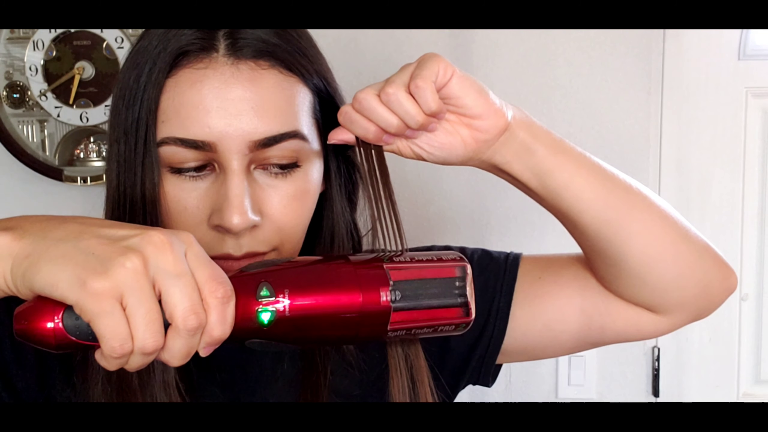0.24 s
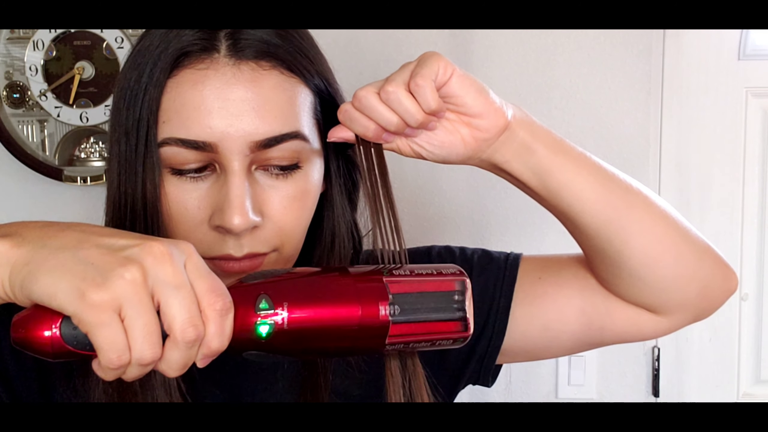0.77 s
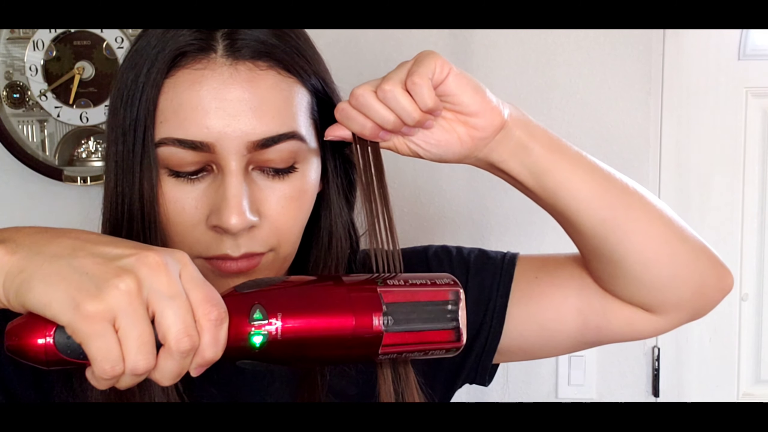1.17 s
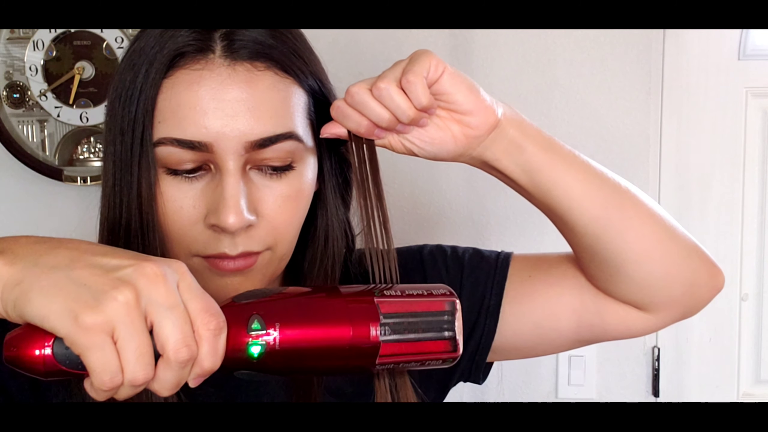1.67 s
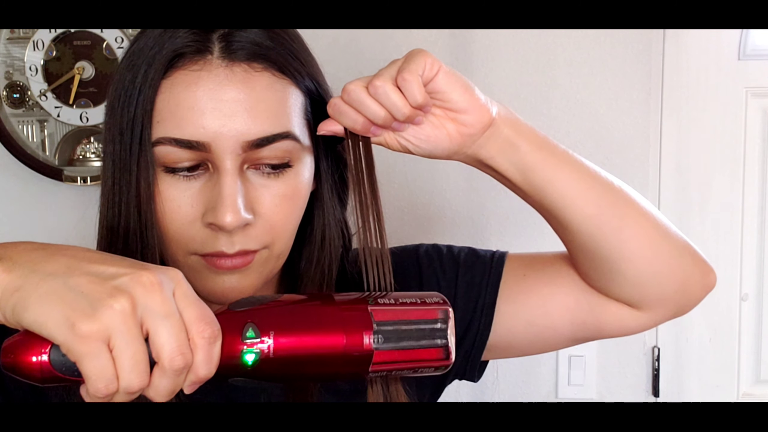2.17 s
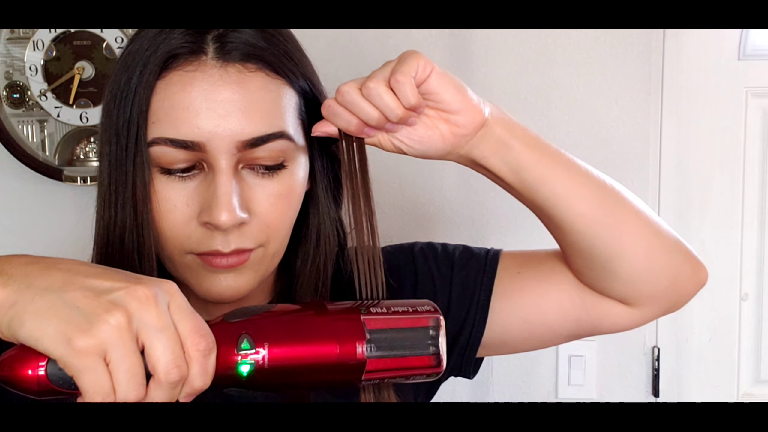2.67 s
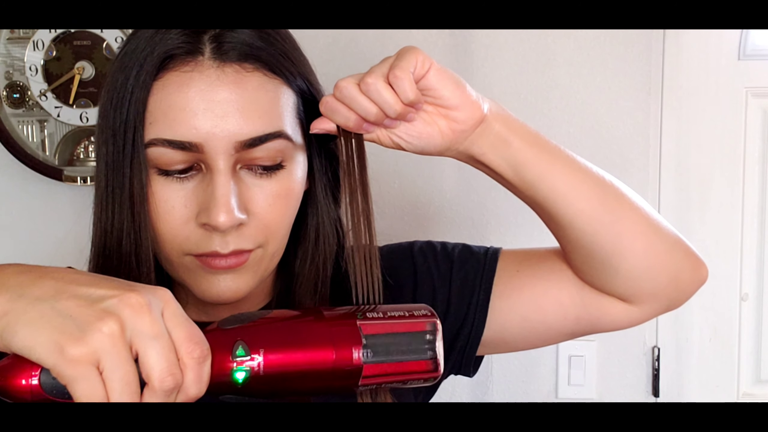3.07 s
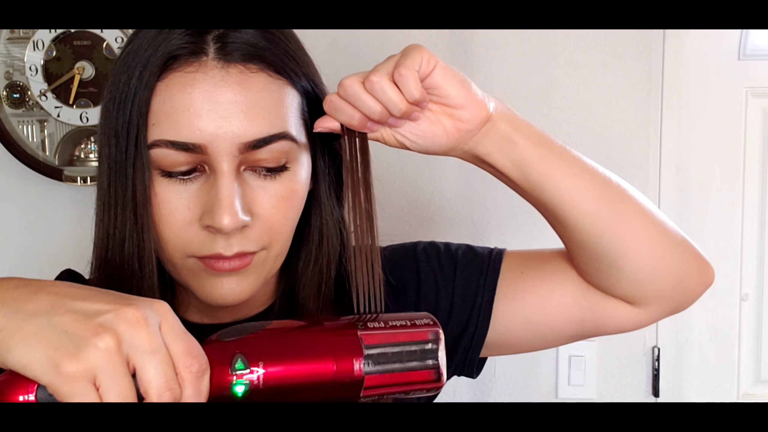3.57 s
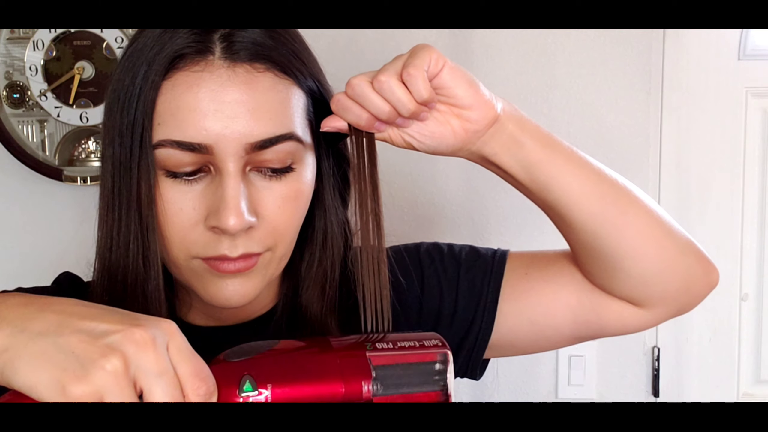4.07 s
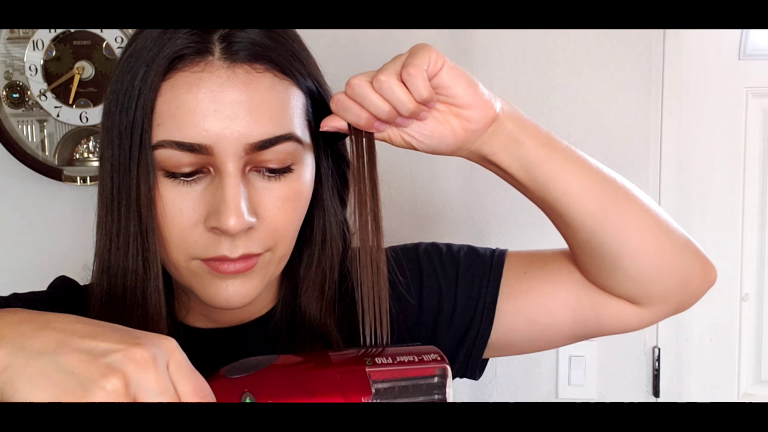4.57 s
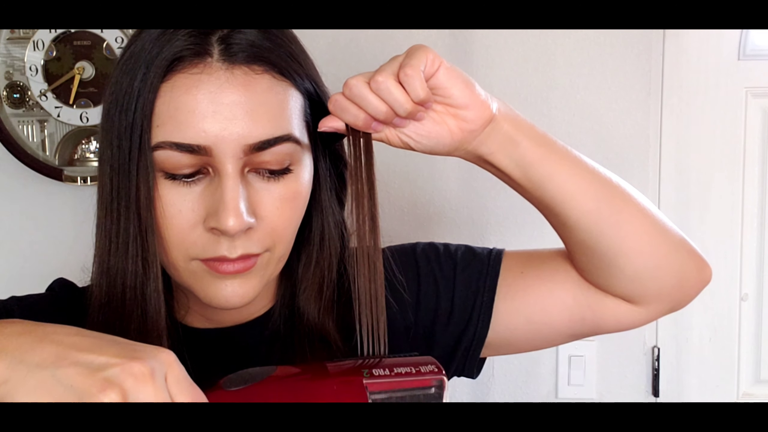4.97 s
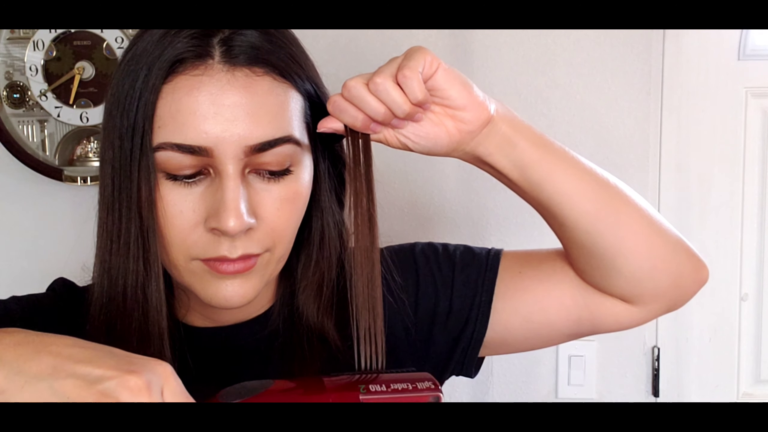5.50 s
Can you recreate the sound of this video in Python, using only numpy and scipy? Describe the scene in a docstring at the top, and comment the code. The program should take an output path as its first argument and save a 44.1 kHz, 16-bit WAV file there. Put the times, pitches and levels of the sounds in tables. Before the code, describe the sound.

A small electric hair trimmer is already running at 0 s and continues to the end, near 5.7 s, close to a stereo microphone in a quiet room. The motor gives a dense, coarse buzz at nearly steady speed, wavering only slightly. Its gears ring the plastic casing in a nasal midrange, while the cutter adds a very rapid knock, about twenty-two per second, blurred into a rough flutter with tiny bright ticks and a repeating scratchy hiss. From about 0.75 to 2.2 s the sound grows brighter and the knock firmer as the tool rolls and hair is pulled tight. It stays strong until about 3.2 s, then the knock softens gradually, while a thin whine strengthens as the tool is lowered and the tone shifts subtly. Short reflections surround it. Beneath lie a deep, steady appliance hum, slightly stronger on the left, and faint low room air.

```python
"""From the start a small hair trimmer runs close by in a quiet room, over the steady hum of an appliance.
Each motor turn repeats the same gear contacts, which ring the plastic casing; the cutter drum turns three
times slower and adds a knock, a few ticks and a scrape that repeats. Mostly between 0.75 and 2.2 s the tool
rolls its window toward the listener, and the knock grows as the hair is drawn tight. As the hand goes on
lowering the tool, with small moves back up, its colour and echoes shift; after 3.2 s the knock softens."""
import sys
import numpy as np
from scipy import signal
from scipy.fft import rfft, irfft
from scipy.io import wavfile
from scipy.ndimage import uniform_filter1d, map_coordinates

SR = 44100
rng = np.random.default_rng(int(sys.argv[2]) if len(sys.argv) > 2 else 0)


def field_ratio(decibels):
    """Amplitude ratio for a level in dB (20 dB per decade); scalars and array-likes work."""
    return 10 ** (np.asarray(decibels, dtype=float) / 20)


def unload_audio(sound):
    """Save the sound as a 16-bit wav file, at the path given as the first command line argument."""
    columns = np.transpose(np.atleast_2d(sound))
    # keep every value between -1 and 1, then stretch to whole-number steps
    steps = np.round(np.clip(columns, -1, 1) * 32767)
    wavfile.write(sys.argv[1], SR, steps.astype(np.int16))


N = 253134  # length [samples]
TIME = np.arange(N) / SR


def rms_one(x):
    """Scale to unit rms."""
    return x / np.sqrt(np.mean(x ** 2) + 1e-20)


def in_time(rows):
    """Columns of a curve table, one value per sample."""
    s, *columns = np.transpose(rows)
    return [np.interp(TIME, s, column) for column in columns]


def level_in_pose(level, pose):
    """Level in dB that follows how far the tool is lowered and rolled."""
    lowered, rolled = pose
    base_db, lowered_db, rolled_db = level
    return base_db + lowered_db * lowered + rolled_db * rolled


def every(turns, share, count):
    """Angles share, share + count, .. that the motor passes, in turns."""
    return np.arange(share % count, turns[-1], count)


def strikes(turns, at, db, slack_us, spread_db):
    """Clicks at given motor angles, each a little early or late and a little uneven."""
    chance = rng.standard_normal((len(at), 2))
    where = np.interp(at, turns, np.arange(N)) + chance[:, 0] * slack_us * SR / 10 ** 6
    where = np.clip(where, 0, N - 2)
    whole = where.astype(int)
    size = field_ratio(db + spread_db * chance[:, 1])
    clicks = np.full(N, 1e-18)
    # a click between two samples is shared by both
    np.add.at(clicks, whole, size * (1 - where + whole))
    np.add.at(clicks, whole + 1, size * (where - whole))
    return clicks


def ring(clicks, modes, order=1):
    """Parallel resonances of alternating sign; passed through more than once they swell before they fade."""
    out = 0
    for k, (hz, width, db) in enumerate(modes):
        r = np.exp(-np.pi * width / SR)
        w = 2 * np.pi * hz / SR
        tone = clicks
        for _ in range(order):
            tone = signal.lfilter([(1 - r * r) / 2, 0, (r * r - 1) / 2], [1, -2 * r * np.cos(w), r * r], tone)
        out = out + (-1) ** k * field_ratio(db) * tone
    return out


def coloured(spectrum, alike, looped=None, repeats=None):
    """Stereo noise of a given spectrum, the two sides alike by a share; part of it may be a looped noise."""
    log_hz = np.log(np.maximum(np.arange(N // 2 + 1) * SR / N, 1))
    hz, db = np.transpose(spectrum)
    gain = field_ratio(np.interp(log_hz, np.log(hz), db))
    white = rfft(rng.standard_normal((2, N)))
    if looped is not None:
        hz, shares = np.transpose(repeats)
        share = np.interp(log_hz, np.log(hz), shares)
        white = np.sqrt(1 - share) * white + np.sqrt(share) * rfft(looped)
    mid, side = irfft(white * gain, N)
    return rms_one(np.sqrt(1 + alike) * mid + np.sqrt(1 - alike) * side * np.array([[1], [-1]]))


# motor speed under the changing pull of the hair: (time [s], speed [turns per s])
MOTOR_SPEED = [(0.0, 67.48), (0.4, 67.246), (0.5, 67.488), (1.11, 67.065), (1.33, 67.384), (1.69, 67.005),
               (2.28, 67.022), (2.49, 67.392), (2.78, 67.095), (3.15, 67.298), (3.56, 67.406),
               (3.79, 67.091), (3.86, 67.405), (4.07, 67.162), (4.83, 67.477), (5.06, 67.35),
               (5.21, 67.376), (5.74, 67.117)]


def motor():
    """Adding up the speed gives the angle, in turns, that times every contact."""
    return np.cumsum(in_time(MOTOR_SPEED)[0]) / SR


# the hand lowers the tool along the hair and rolls its window toward the listener:
# (time [s], lowered [0-1], rolled [0-1])
HAND_POSE = [(0.0, 0.02, 0), (0.75, 0, 0.08), (1.4, 0.35, 0.8), (2.2, 0.3, 1), (3.1, 0.54, 1),
             (3.5, 0.32, 1), (4.2, 0.72, 0.84), (4.6, 0.79, 0.7), (5.3, 0.9, 0.62), (5.74, 0.81, 0.6)]


def hand():
    """The pose of the tool, which sets the loudness of its parts and blends the scrape."""
    return in_time(HAND_POSE)


# gear contacts within one motor turn: (angle [share of turn], then relative force [dB] on
# handle, shell, head, whine, window)
GEAR_CONTACTS = [(0.9754, 5.5, 7.5, 6.5, 22, 7.5), (0.089, -10, -34, -4, -18, 0),
                 (0.243, -2.5, -3.5, -1, -29, -0.5), (0.4603, 12, -12, -2.5, -11, 1.5),
                 (0.6018, -4, -2.5, 0.5, -32, -7), (.72, -48, -47, 2.5, -13, -11),
                 (0.8619, 2.5, -11.5, 3, -24, -10)]
# the drum is slightly out of round, so its three turns press differently: (force in each turn [dB])
TURN_PRESS = [-0.089, 0.28, 0.42]
# how far ahead of the mark handle, shell, head, whine and window are struck: (lead [share of turn] of each)
STRIKE_LEAD = [0.023, 0.0597, 0.04096, 0.0958, 0.0694]
# resonances of the casing parts: (frequency [Hz], width [Hz], relative level [dB])
HANDLE_MODES = [(1101, 176, 4), (1349, 72, -4.5), (876.6, 37, -9), (733, 36, -10.5), (676.5, 73, -16)]
SHELL_MODES = [(1610, 267, -5), (1946, 155, -15)]
HEAD_MODES = [(2109, 160, -2), (2216, 122, -0.5), (2364, 57, -17), (2534, 100, 2), (2700, 58, -8),
              (3021, 55, -1.5), (3186, 156, -1.5)]
WHINE_MODES = [(2758, 60, -1), (2829, 55, 1.5), (2360, 110, -8), (2692, 50, -8)]
WINDOW_MODES = [(3457, 53, -0.5), (3373, 61, -13), (3662, 210, 7), (3880, 97, 15), (4138, 240, -1),
                (4320, 146, -10), (4490, 176, -1.5), (5166, 100, -6.5)]
# loudness of each part: (relative base level [dB], gain fully lowered [dB], gain fully rolled [dB])
HANDLE_LEVEL = (-29, -4.0, 0.8)
SHELL_LEVEL = (-35, 3, -0.5)
HEAD_LEVEL = (-27, -11.5, 0.9)
WHINE_LEVEL = (-45.5, 18, 0.5)
WINDOW_LEVEL = (-33.5, 0.4, 6.5)


def gears(turns, pose):
    """The same contacts every turn ring each part of the casing; also gives the clicks on the window."""
    parts = [(HANDLE_MODES, HANDLE_LEVEL), (SHELL_MODES, SHELL_LEVEL), (HEAD_MODES, HEAD_LEVEL),
             (WHINE_MODES, WHINE_LEVEL), (WINDOW_MODES, WINDOW_LEVEL)]
    angles = [every(turns, row[0], count=1) for row in GEAR_CONTACTS]
    at = np.concatenate(angles)
    rows = np.concatenate([[row] * len(a) for row, a in zip(GEAR_CONTACTS, angles)])
    press_db = np.array(TURN_PRESS)[np.round(at).astype(int) % 3]
    casing, touch = 0, 0
    for k, (modes, level) in enumerate(parts):
        # gears run true: little slack in time, nearly even force
        touch = strikes(turns, at - STRIKE_LEAD[k], rows[:, k + 1] + press_db, slack_us=6, spread_db=.8)
        part = rms_one(ring(touch, modes, order=2))
        casing = casing + field_ratio(level_in_pose(level, pose) - 2.5) * part
    return casing, touch


# the short knock of the cutter: (frequency [Hz], width [Hz], relative level [dB])
KNOCK_MODES = [(3656, 700, -0.5), (4063, 590, 1.5), (2490, 310, -3)]
# the cutter knocks harder once the hair is drawn tight: (time [s], level [dB])
KNOCK_CURVE = [(0, -17), (1.2, -15), (1.7, -11), (2.2, -8.5), (3.2, -8.5), (4.0, -10), (4.8, -11.5),
               (5.74, -12)]
# blade ticks: (turn of drum cycle [motor turns], relative level [dB])
BLADE_TICKS = [(1, -18.5), (2.93, -18.5), (1, -11.5), (1.2, -23)]
# the bright ring of a tick: (frequency [Hz], width [Hz], relative level [dB])
TICK_MODES = [(11020, 420, 1.5), (13400, 1500, -28)]
# loudness of the ticks: (relative base level [dB], gain fully lowered [dB], gain fully rolled [dB])
TICK_LEVEL = (7.5, 0, 6.5)


def cutter(turns, pose):
    """One short knock and a few bright ticks each drum cycle of three motor turns."""
    knock_at = every(turns, 1.935, count=3)
    blows = strikes(turns, knock_at, 0, slack_us=6, spread_db=.6)
    knock = ring(blows, KNOCK_MODES, order=3)
    knock = knock / np.percentile(np.abs(knock), 99.9)  # nearly its peak
    clicks = sum(strikes(turns, every(turns, turn, count=3), db, slack_us=6, spread_db=1.5)
                 for turn, db in BLADE_TICKS)
    ticks = ring(clicks, TICK_MODES)
    return field_ratio(in_time(KNOCK_CURVE)[0]) * knock + field_ratio(level_in_pose(TICK_LEVEL, pose)) * ticks


def scrape(turns, lowered):
    """Two noises tied to the drum's angle; each blends through three patterns as the tool is lowered."""
    grain_s, grain_db = .0005, 2.5  # rough and smooth spots on the drum
    size = int(3 * N / turns[-1])  # samples in an average drum cycle
    angle = turns / 3 % 1 * size
    spots = rms_one(uniform_filter1d(rng.standard_normal(size), int(grain_s * SR), mode="wrap"))
    patterns = rng.standard_normal((3, 2, size)) * field_ratio(grain_db * spots)
    out = np.zeros((2, N))
    for k, pair in enumerate(patterns):
        weight = np.cos(np.pi * (lowered + 2 * k / 3))
        out += weight * np.array([map_coordinates(p, [angle], order=3, mode="grid-wrap") for p in pair])
    return rms_one(out)


# loose rattle and air of the motor: (frequency [Hz], relative level [dB per Hz])
RATTLE_SPECTRUM = [(400, -29.5), (700, -24), (1100, -15.5), (1500, -20.5), (1900, -14.5), (2300, -10),
                   (2700, -5), (3100, -9.5), (3400, -5), (3800, -11), (4100, -9.5), (4500, -9),
                   (5200, -14.5), (6200, -20.5), (7900, -18.5), (9100, -24.5), (10900, -20.5), (12500, -23),
                   (14500, -26), (15600, -14.5)]
# the drum scrapes the same way every cycle: (frequency [Hz], share of the rattle's power that repeats [0-1])
SCRAPE_SHARE = [(600, .85), (4500, .8), (5500, .65), (8000, .55), (12000, .4)]
# a narrow ring of the scrape, then a high ring: (frequency [Hz], width [Hz], relative level [dB])
BUZZ_MODES = [(4140, 350, 0)]
UPPER_MODES = [(7940, 460, -6), (6740, 1100, -6)]
# loudness of each: (relative base level [dB], gain fully lowered [dB], gain fully rolled [dB])
RATTLE_LEVEL = (-41, -0.67, 0.1)
BUZZ_LEVEL = (-35.5, -9.5, -4.5)
UPPER_LEVEL = (-35, 1.5, -6)


def rattle(touch, looped, pose):
    """Loose parts hiss all the time and flare for a moment after each contact; a small part rings high."""
    fade = np.exp(-1 / (0.002 * SR))  # 2 ms
    flare = rms_one(signal.lfilter([1], [1, -fade], touch))
    noise = coloured(RATTLE_SPECTRUM, alike=0.025, looped=looped, repeats=SCRAPE_SHARE) * (1 + 0.57 * flare)
    # the hiss is levelled by its treble
    treble = signal.butter(4, [9000, 15000], "band", fs=SR, output="sos")
    treble_rms = np.sqrt(np.mean(signal.sosfilt(treble, noise) ** 2))
    hiss = field_ratio(level_in_pose(RATTLE_LEVEL, pose) + 2.0) * noise / treble_rms
    buzz = field_ratio(level_in_pose(BUZZ_LEVEL, pose)) * rms_one(ring(looped, BUZZ_MODES, order=2))
    shaken = (rng.standard_normal((2, N)) + looped) * (1 + 0.077 * flare)
    high_ring = field_ratio(level_in_pose(UPPER_LEVEL, pose) - 2.5) * rms_one(ring(shaken, UPPER_MODES, order=2))
    return hiss + buzz + high_ring


# near echoes off the hands, chest and wall, left list then right list:
# (delay at start [ms], delay at end [ms], level before the side's gain [dB])
ECHO_PATHS = [
    [(.31, 0.55, -11.5), (1.3, 1.15, -21.5), (3.7, 3.55, -9)],
    [(.17, 0.23, -8), (1.7, 2, -36), (4.3, 4.2, -13.5)],
]
# how far the left side leads the right: (lead at start [ms], lead at end [ms])
LEFT_LEAD = [0.08, 0.015]


def near_echoes(x):
    """Each side hears the tool plus echoes with sliding delays; long waves bend past and echo little."""
    bright = signal.sosfilt(signal.butter(2, 1400, "high", fs=SR, output="sos"), x)
    late = np.arange(N) - np.linspace(*LEFT_LEAD, N) * SR / 1000
    out = np.array([x, map_coordinates(x, [late], order=3)])
    for side, echoes in enumerate(ECHO_PATHS):
        for start_ms, end_ms, db in echoes:
            lag = np.linspace(start_ms, end_ms, N) * SR / 1000
            out[side] += field_ratio(db) * map_coordinates(bright, [np.arange(N) - lag], order=3)
    return out


def room(x):
    """A dying noise tail, its own on each side, duller than the source."""
    t60_s, level_db = 0.27, -15
    t = TIME[:int(.4 * SR)]
    tail = rng.standard_normal((2, len(t))) * field_ratio(-60 * t / t60_s) * (t > .006)
    tail = signal.lfilter([.5], [1, -.5], tail)
    tail = tail / np.sqrt(np.sum(tail ** 2, axis=1, keepdims=True))
    return field_ratio(level_db) * signal.fftconvolve(x[None], tail, axes=1)[:, :N]


# overtones of the hum: (multiple of its frequency, relative level [dB])
HUM_OVERTONES = [(1, 0), (2, -27), (3, -28.5), (5, -33)]
# the hum wavers slightly: (time [s], rms level before the side's gain [dB])
HUM_CURVE = [(0.05, -24), (1.13, -24), (3.12, -23), (3.25, -24.5), (4.13, -23), (4.25, -24.5), (5.51, -24),
             (5.68, -23)]


def hum():
    """A low tone with weak overtones, later and louder on the left; a second tone beats with its double."""
    hum_hz, hum_crest_s = 58.757, 3.2212
    second_hz, second_db, loudest_s = 120, -47.5, 1.277
    level_db = in_time(HUM_CURVE)[0]
    t = TIME - np.array([[.0003], [0]])
    tone = sum(field_ratio(db + level_db) * np.cos(2 * np.pi * k * hum_hz * (t - hum_crest_s))
               for k, db in HUM_OVERTONES)
    # both tones crest together near the loudest moment of the beat
    crest_s = hum_crest_s + np.round((loudest_s - hum_crest_s) * hum_hz) / hum_hz
    tone = tone + field_ratio(second_db) * np.cos(2 * np.pi * second_hz * (t - crest_s))
    return np.sqrt(2) * tone * field_ratio(np.array([[.35], [-.35]]))


# quiet air of the room: (frequency [Hz], relative level [dB per Hz])
ROOM_TONE_SPECTRUM = [(20, -7), (40, -6), (90, 2), (140, -7.5), (220, -7.5), (300, -10.5), (500, -15.5),
                      (800, -17), (1500, -12), (4000, -45)]


def room_tone():
    """Soft, mostly low noise, nearly the same on both sides."""
    return field_ratio(-39.5) * coloured(ROOM_TONE_SPECTRUM, alike=0.89)


def scene():
    """Trimmer with its echoes and room, hum and room tone."""
    turns = motor()
    pose = hand()
    casing, touch = gears(turns, pose)
    tool = casing + cutter(turns, pose)
    # left and right gains in dB
    near = near_echoes(tool) * field_ratio(np.array([[.1], [-1.2]]))
    hiss = rattle(touch, scrape(turns, pose[0]), pose) * field_ratio(np.array([[1.3], [-1.3]]))
    return near + hiss + room(tool) + hum() + room_tone()


def roll_off(x):
    """The treble ends steeply here."""
    return signal.sosfilt(signal.butter(12, 15700, fs=SR, output="sos"), x)


def record(dry):
    """A steep filter removes the top, down 60 dB from 15.7 kHz."""
    cut = signal.cheby2(12, 60, 15700, fs=SR, output="sos")
    mix = signal.sosfilt(cut, dry)
    return roll_off(mix)


dry = scene()
out = record(dry)
unload_audio(out)
```